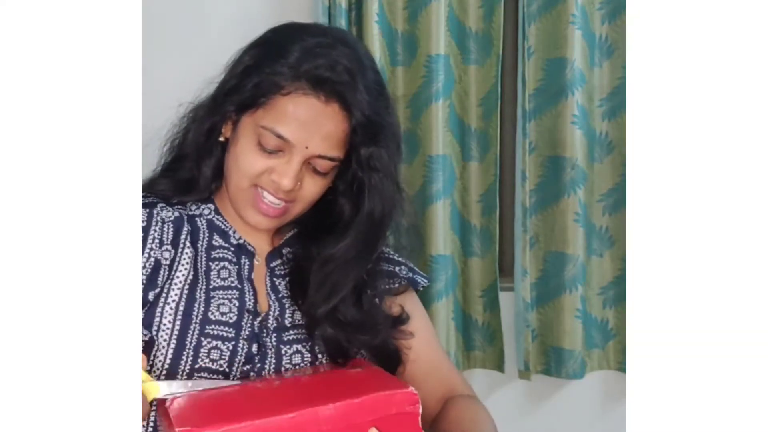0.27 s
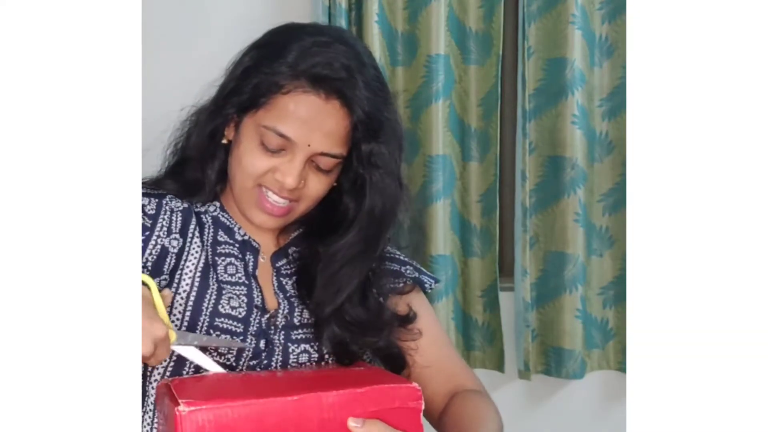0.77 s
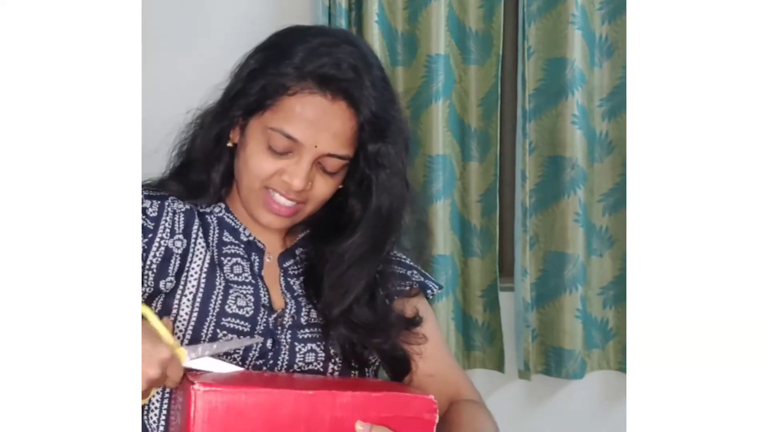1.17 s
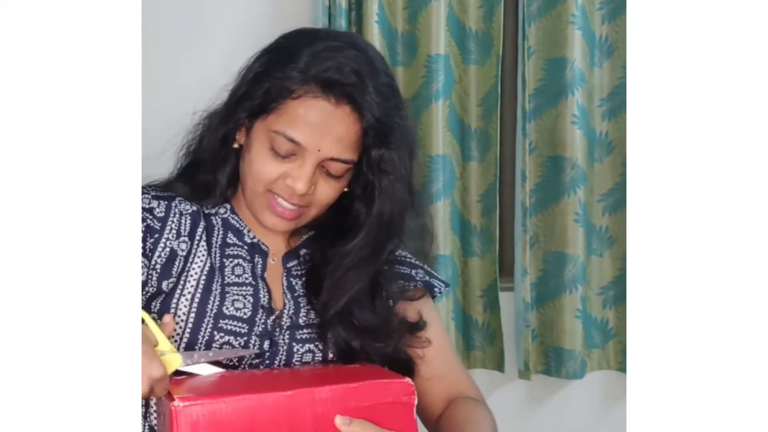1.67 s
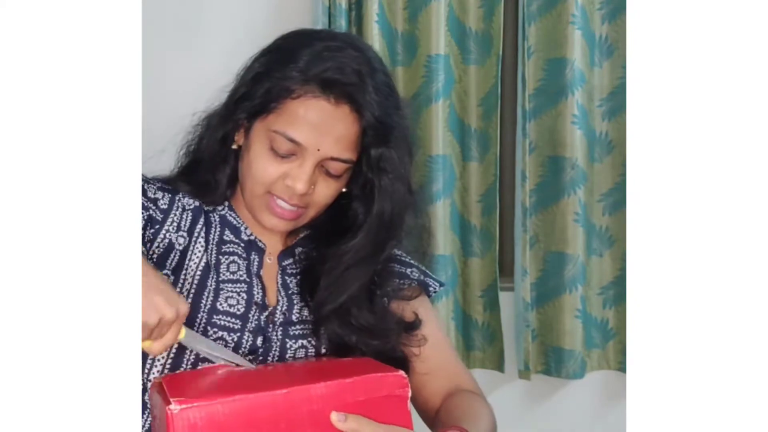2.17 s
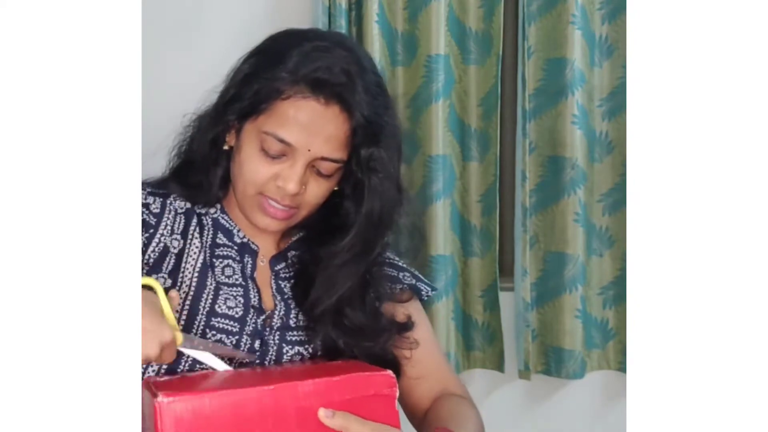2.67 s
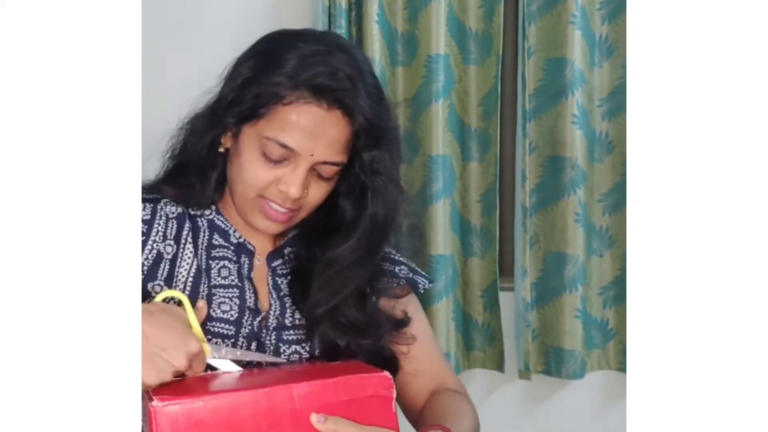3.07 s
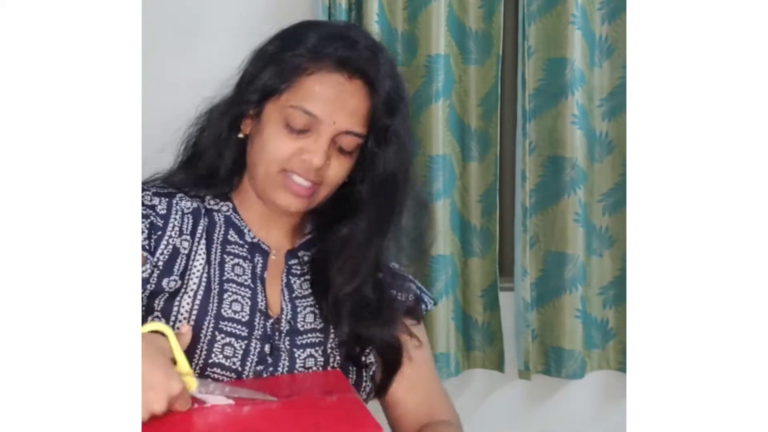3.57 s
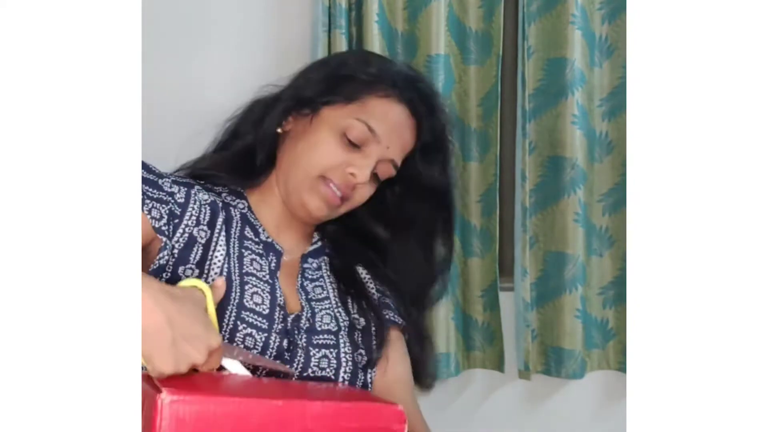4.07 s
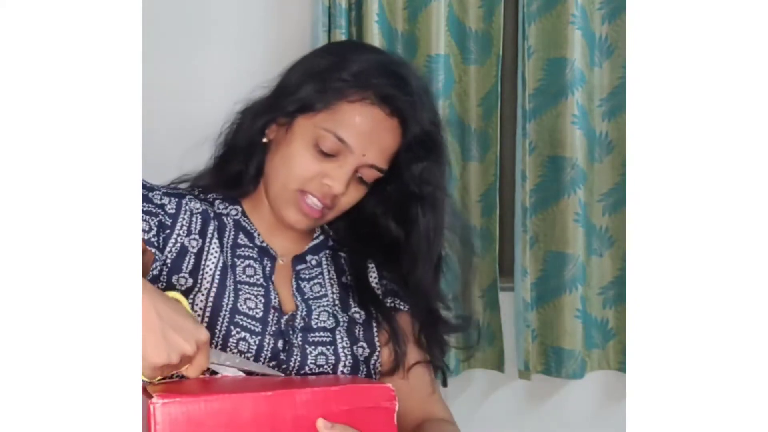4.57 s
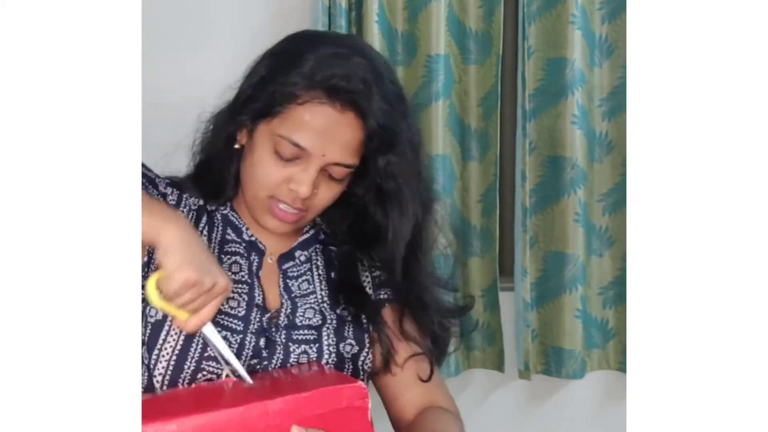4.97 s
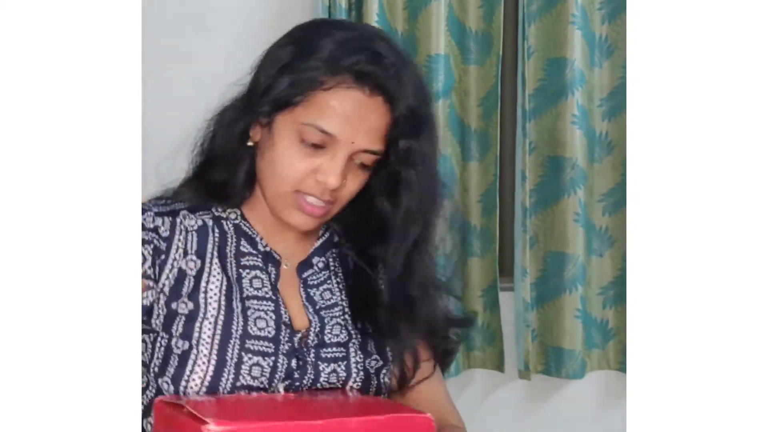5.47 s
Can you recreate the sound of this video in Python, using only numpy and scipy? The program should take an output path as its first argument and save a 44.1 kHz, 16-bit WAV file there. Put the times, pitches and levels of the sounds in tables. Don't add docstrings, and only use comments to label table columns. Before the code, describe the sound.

Close to a phone microphone in a small room, scissors nibble at a taped cardboard box: dry rasps, hissing tape, sharp snaps and boomy knocks. Traffic rumbles outside. After a quieter stretch with scattered cuts, a vehicle horn blares briefly and echoes away; then the blade bites again, ending with the hardest knock.

```python
import sys
import numpy as np
from scipy import signal
from scipy.fft import rfft, irfft, next_fast_len
from scipy.io import wavfile
from scipy.ndimage import uniform_filter1d

SR = 44100
rng = np.random.default_rng(int(sys.argv[2]) if len(sys.argv) > 2 else 0)


def invert_db(level):
    return 10 ** (np.asarray(level, dtype=float) / 20)


def master(y):
    cut = np.clip(np.atleast_2d(y).T, -1, 1)
    pcm = np.round(cut * 32767)
    wavfile.write(sys.argv[1], SR, pcm.astype(np.int16))


N = 252693


def in_time(rows, fade_in_s=0.0037):
    s, *columns = np.transpose(rows)
    t = np.arange(N) / SR
    mask = np.clip(np.minimum((t - s[0]) / fade_in_s, (s[-1] - t) / 0.005), 0, 1)
    return [np.interp(t, s, c) for c in columns] + [mask]


def rms_one(x):
    return x / np.sqrt(np.mean(x ** 2) + 1e-20)


def sine(turns):
    return np.sqrt(2) * np.sin(2 * np.pi * turns)


def drift(rate):
    r = np.exp(-64 * np.pi * rate / SR)
    slow = signal.lfilter([1], [1, -2 * r, r * r], rng.standard_normal(N // 32 + 1002))[1000:]
    return np.interp(np.arange(N) / 32, np.arange(len(slow)), rms_one(slow))


def resonance(x, hz, width_hz):
    r = np.exp(-np.pi * width_hz / SR)
    feedback = [1, -2 * r * np.cos(2 * np.pi * hz / SR), r * r]
    return signal.lfilter([(1 - r * r) / 2, 0, (r * r - 1) / 2], feedback, x + 1e-18)


def body(x, modes):
    out, power = 0, 0
    for k, (hz, width_hz, db) in enumerate(modes):
        out = out + invert_db(db) * (-1) ** k * resonance(x, hz, width_hz)
        power += invert_db(db) ** 2 * np.pi * width_hz / SR
    return out / np.sqrt(power)


def box():
    # frequency in [Hz], width in [Hz], level in [dB].
    air_modes = [(129.7, 31.7, -4.5), (175.2, 13.64, 0.5), (213, 15.1, -6), (298.4, 27.7, -1.5),
                 (350, 46.6, -3), (420, 36.6, 0.5), (558, 28, -15)]
    panel_modes = [(736, 114, 3), (833.6, 64.3, 8), (952.8, 29, 4.5), (1062, 97, 5), (1210, 285, 2),
                   (1480, 141.6, 7.5), (1600, 279, 2), (2065.6, 174.4, -1)]
    tape_modes = [(2627, 85, 1.5), (2982, 75.7, -1.5), (3927, 509, -1.5), (4935, 380, -4), (5886, 395, 2),
                  (6340, 856, 0), (6887, 787, -1), (8730, 1330, -8.5), (12500, 9000, -16)]
    snap_modes = [(2820, 650, -12), (4070, 1900, -8.5), (5816, 864, 7), (8850, 2650, 4.5),
                  (11540, 10800, 0.5), (15500, 3000, -4.5)]
    air, panels, tape = blade_force()
    rings, (panel_crack, snap_crack) = knocks()
    out = body(air, air_modes) + body(panels + panel_crack, panel_modes)
    return out + body(tape, tape_modes) + body(snap_crack, snap_modes) + rings


def blade_force(grains_per_s=8000, spread_db=2.6, judder_db=2.2):
    # start in [s], time to lose 20 dB in [s], box boom in [dB],
    # panel rasp in [dB re boom], tape hiss in [dB re boom].
    bites = [(.33, 0.08, -52.5, -4.5, -3.5), (.394, 0.05, -50, -2, -6.5), (0.562, .025, -44.5, -4.5, 1),
             (.598, 0.0052, -47.5, 1, 9.5), (.606, .09, -38, -1, 4), (0.834, .018, -36, 2.5, 9),
             (.842, .075, -34, 5, -1), (2.28, 0.39, -53.5, -3.5, 0), (2.676, 0.1124, -50.5, 0.5, -1),
             (2.852, .07, -34.5, -4.5, -3), (3.095, 0.0047, -48, -7.5, -13), (4.972, .035, -56, -1, -2.5),
             (5.047, .03, -43, -1, -5), (5.092, 0.087, -30.5, -2.5, -7.5), (5.34, .07, -31.5, -13.5, -20.5),
             (5.383, .018, -33, 5, 2), (5.385, .08, -28, 1, -12)]
    # middle in [s], then as for bites.
    slides = [(0.436, 0.0321, -27.5, -6, -17), (.51, 0.1432, -51, -14, -10.5), (.94, 0.21, -47, -6, -13),
              (1.815, .09, -58, -8, 0), (2.372, 0.0642, -36, -4.5, -6.5), (2.487, 0.0873, -47, -2.5, -6.5),
              (3.21, .13, -37, -10, -10), (5.03, .05, -50, 0, -6), (5.22, .09, -53, -4, -8),
              (5.376, -0.001, -28.5, -5, -12), (5.49, 0.2239, -58.5, 2, -18)]
    bite_rise_s, bite_roundness, slide_roundness = 0.003, 2.8, 1.6
    lead_db, lead_s = -15, 0.0144

    sizes = invert_db(spread_db * np.minimum(rng.exponential(1, N), 5)) * rng.choice([-1, 1], N)
    slips = rng.random(N) < grains_per_s / SR
    grains = rms_one(sizes * slips * invert_db(judder_db * drift(51.6)))

    force, t = np.zeros((3, N)), np.arange(N) / SR
    for s, fall_s, boom_db, rasp_db, hiss_db in bites:
        rise = np.clip((t - s) / bite_rise_s, 0, 1)
        lead_in = invert_db(lead_db - 20 * np.maximum(s - t, 0) / lead_s)
        fall = invert_db(-20 * (np.maximum(t - s, 0) / fall_s) ** bite_roundness)
        force += invert_db(boom_db + np.array([[0], [rasp_db], [hiss_db]])) * np.maximum(rise, lead_in) * fall
    for s, fall_s, boom_db, rasp_db, hiss_db in slides:
        shape = invert_db(-20 * np.abs((t - s) / fall_s) ** slide_roundness)
        force += invert_db(boom_db + np.array([[0], [rasp_db], [hiss_db]])) * shape
    return force * grains


def knocks(boom_cycles=4.13, panel_s=0.002866, crack_s=0.0027, rise_s=0.000872):
    # time in [s], peak in [dB], boom in [dB re peak], boom in [Hz], panel in [Hz].
    thumps = [(.375, -40, -0.5, 187, 1554), (.398, -30.5, 7.5, 167.2, 1600), (.424, -22.5, 7, 350, 722),
              (.432, -40, 15, 165, 900), (.479, -40.5, 14, 171.6, 748), (.611, -30, 7.5, 342, 1160),
              (.845, -22, 5, 421, 819), (1.136, -41.5, 5, 159.3, 810), (1.335, -47, 8, 341.4, 822),
              (2.049, -47, 8.5, 360, 707), (2.348, -48, 11, 146.7, 810), (2.476, -27.5, -23, 179, 1177),
              (2.851, -30, 7.5, 124.4, 1565), (3.092, -34.5, 1.5, 146.6, 855), (3.2, -34, 2.5, 390, 620),
              (3.217, -34.5, 12.5, 292, 1122), (3.345, -40, 10, 297.4, 1553),
              (5.017, -43.5, 5.5, 130.2, 1173), (5.093, -24, 5.5, 408.3, 948),
              (5.121, -26.5, -1.5, 420, 1319), (5.156, -31, -12, 165, 788), (5.344, -39, 27, 413.6, 590),
              (5.385, -8.5, -2, 314, 1567), (5.392, -18, -3.5, 264, 707)]
    # time in [s], peak in [dB], tick in [dB re peak], panel in [Hz].
    snips = [(.331, -46, 10, 1480), (.392, -34.5, 1, 1567), (.427, -36, 7, 1496), (.479, -47.5, 15, 1500),
             (.564, -35, 9, 1880), (.598, -34, 14, 1600), (.612, -35, 4, 1950), (.835, -10.5, 2, 1231),
             (2.019, -44, -4.5, 1210), (2.279, -35, 14, 1423), (2.389, -34, 3.5, 1086),
             (2.524, -47.5, 7, 1200), (2.676, -30.5, 5, 1528), (2.852, -28, 2, 1548), (4.39, -52, 2, 856),
             (4.795, -58.5, 3, 1370), (4.999, -43.5, 6.5, 1153), (5.046, -29.5, -3.5, 1210),
             (5.233, -41, 5, 1104), (5.017, -49, 11, 1200), (5.156, -42, 9, 1300), (5.385, -20, 0.5, 3044)]
    thump_tick_db, snip_boom_db, snip_boom_hz = -11.5, -8, 342.4

    rings, cracks, age = np.zeros(N), np.zeros((2, N)), np.arange(5000) / SR
    blows = [(s, db, boom_db, thump_tick_db, boom_hz, panel_hz) for s, db, boom_db, boom_hz, panel_hz in thumps]
    blows += [(s, db, snip_boom_db, tick_db, snip_boom_hz, panel_hz) for s, db, tick_db, panel_hz in snips]
    bursts = rng.standard_normal((len(blows), len(age)))
    for (s, db, boom_db, tick_db, boom_hz, panel_hz), burst in zip(blows, bursts):
        start = round(s * SR)
        span = slice(start, start + len(age))
        blow_rise_s = rise_s * invert_db(-0.3 * (db + 42.5))
        contact = (1 - np.exp(-age / blow_rise_s)) ** 2
        swell = 1 - np.exp(-age * boom_hz / 0.846)
        boom_decay = np.exp(-age * boom_hz * np.sqrt(boom_hz / 200) / boom_cycles)
        boom = swell * boom_decay * np.sin(2 * np.pi * boom_hz * age)
        panel = contact * np.exp(-age / panel_s) * np.sin(2 * np.pi * panel_hz * age)
        rings[span] += invert_db(db + boom_db - 3.5) * boom + invert_db(db - 1.0) * panel
        crack = contact * np.exp(-age / crack_s) * burst
        cracks[:, span] += invert_db(db + np.array([[-3], [tick_db - 3.5]])) * crack
    return rings, cracks


def room(x, t60_s=0.177, dull_hz=6000):
    size = next_fast_len(N + SR)
    hz = np.arange(size // 2 + 1) * SR / size
    t60 = t60_s / (1 + hz / dull_hz) ** 0.36
    response = 0
    for k, lag_s in enumerate(rng.uniform(0.006, 0.028, 10)):
        loop = invert_db(-60 * lag_s / t60) * np.exp(-2j * np.pi * hz * lag_s)
        response = response + (-1) ** k * loop / (1 - loop)
    return irfft(rfft(x, size) * response, size)[:N]


def horn(blare_smear_db=-12, overtone_smear_db=-4, scatter_per_s=1.6):
    # time in [s], blare in [dB].
    loudness = [
        (3.495, -68),
        (3.515, -39.5),
        (3.551, -27.5),
        (3.653, -29),
        (3.755, -31),
        (3.87, -39),
        (4.3, -49),
        (4.75, -53.5),
        (4.96, -75),
    ]
    # multiple of the pitch [1], level in [dB].
    blare = [(1, -22), (2, -34.5), (3, -33), (6, -32.5), (7, -16), (8, -6), (9, -2), (10, 1), (11, -6.5),
             (12, -15), (13, -40), (14, -32.5)]
    overtones = [(16, -9.5), (17, -7.5), (18, -5), (19, -6), (20, -4.5), (21, -5.5), (22, -2), (23, -11.5),
                 (24, -9), (25, -7), (26, -7.5), (27, -11.5), (28, -22), (30, -26.5), (33, -21), (36, -39),
                 (41, -24), (46, -28.5)]
    # level in [dB], flutter in [1/s], steady share [1].
    paths = [(-1, 9, 0.78), (-8, 16, 0.084), (-10, 20, .1), (-15.5, 9, .1)]
    path_shifts = [1, 1.011, 1.021, 1.038]
    end_hz, doppler_hz, passing_s = 338.3, 10.7, 0.3
    overtone_db, dulling_db_per_s = -14.5, 3.5

    blare_db, mask = in_time(loudness)
    on, out = mask > 0, np.zeros(N)
    age = np.arange(on.sum()) / SR
    hz = end_hz + doppler_hz * np.exp(-age / passing_s)
    turns = 2 * np.pi * np.cumsum(hz) / SR
    overtones_db = blare_db + overtone_db - dulling_db_per_s * (np.arange(N) / SR - loudness[0][0])
    scatter = 1 + scatter_per_s * age
    bounced = np.cumsum(scatter) / SR
    groups = ((blare, blare_db, blare_smear_db), (overtones, overtones_db, overtone_smear_db))
    for partials, db, smear_db in groups:
        stack, smear, known = 0, 0, np.transpose(partials)
        for multiple in range(round(known[0, 0]), round(known[0, -1]) + 1):
            level_db = np.interp(multiple, np.round(known[0]), known[1])
            count = 4 if multiple < 15 else 2
            draws = rng.standard_normal((count, 2, 600))
            for ratio, (path_db, per_s, steady), draw in zip(path_shifts, paths, draws):
                steps = bounced * 2 * per_s * np.sqrt(multiple / 9)
                cos_part, sin_part = (np.interp(steps, np.arange(600), d) for d in draw)
                phase = turns * multiple * (1 + (ratio - 1) * min(1, 11 / multiple))
                core = steady / scatter ** 2
                partial = (cos_part + core) * np.cos(phase) + sin_part * np.sin(phase)
                stack = stack + invert_db(level_db + path_db) * partial
            noise = rng.standard_normal(len(hz))
            smear = smear + invert_db(level_db) * resonance(noise, multiple * hz.mean(), 177)
        out[on] += (invert_db(db) * mask)[on] * (rms_one(stack) + invert_db(smear_db) * rms_one(smear))
    return out


def drones():
    # time in [s], pitch in [Hz], level in [dB].
    far_horn = [
        (0, 3296, -62),
        (.06, 3300, -68),
        (.12, 3305, -70),
        (.24, 3310, -80),
    ]
    # start in [s], length in [s], pitch in [Hz], glide in [Hz/s], level in [dB].
    orders = [
        (.1, 0.243, 161.7, -30, -53),
        (1.49, .49, 149.6, 14, -51),
        (2.45, 0.398, 166, -13, -45.5),
        (2.46, 0.596, 85.74, -9, -52.5),
        (4.12, 0.359, 144, 36, -57.5),
    ]
    fade_s, wobble_db = 0.07, 1.7

    far_hz, far_db, mask = in_time(far_horn)
    out = invert_db(far_db) * mask * sine(np.cumsum(far_hz) / SR)
    t = np.arange(N) / SR
    for s, length_s, hz, glide, db in orders:
        fade = np.clip(np.minimum(t - s, s + length_s - t) / fade_s + 0.5, 0, 1) ** 2
        turns = hz * (t - s) + glide * (t - s) ** 2 / 2
        out = out + invert_db(db + wobble_db * drift(4.5)) * fade * sine(turns)
    return out


def street(patchy_db=3.0, top_patchiness=0.52):
    # time in [s], roar in [dB].
    traffic = [(0.0, -61), (0.16, -64.5), (0.4, -63), (0.54, -56), (0.73, -57), (1.29, -65), (2.19, -69),
               (2.33, -70), (2.46, -60.5), (3.62, -57), (3.7, -55), (4.07, -61.5), (4.72, -67.5),
               (5.03, -69.5), (5.19, -59.5), (5.31, -58.5), (5.59, -62), (5.73, -64.5)]
    # frequency in [Hz], density in [dB per Hz].
    street_colour = [(18, -55), (30, -16), (112, -7.5), (157, 2.5), (191, -16), (349, -7.5), (489, -19),
                     (1050, -18), (1230, -17), (2100, -20.5), (2730, -64), (4620, -120)]
    hiss_colour = [(2200, 0.5), (3900, -4), (5000, -4.5), (6200, -8), (7600, -7), (8600, -18.5),
                   (16000, -17)]
    rumble_db, rumble_follows, hiss_db, hiss_follows = -51, 0.674, -65, 0.837

    roar_db, _ = in_time(traffic)
    swing = roar_db - roar_db.mean()
    edges_hz = 30 * 2 ** np.arange(0, 9.4, 1 / 3)
    white, together = rng.standard_normal((2, N)), drift(6)
    parts = np.zeros((3, N))
    for k, (low, high) in enumerate(zip(edges_hz, edges_hz[1:])):
        band = signal.sosfilt(signal.butter(2, [low, high], "band", fs=SR, output="sos"), white[k % 2])
        part = int(low > 580) + int(low > 2200)
        points = np.array(hiss_colour if part == 2 else street_colour)
        db = np.interp(np.log(low * high) / 2, np.log(points[:, 0]), points[:, 1])
        flicker = 0.5 * together + drift(11)
        parts[part] += band * invert_db(db + patchy_db * top_patchiness ** part * flicker)
    rumble, roar, hiss = (rms_one(part) for part in parts)
    out = invert_db(rumble_db + rumble_follows * swing) * rumble + invert_db(roar_db + 0.7065) * roar
    return out + invert_db(hiss_db + hiss_follows * swing) * hiss


def gate_lift_db(near):
    lift_db, opens_db, span_db, closes_db_per_s = 1.5, -48, 21, 126.5
    slope = closes_db_per_s * np.arange(N) / SR
    near_db = 10 * np.log10(uniform_filter1d(near ** 2, size=800) + 1e-12)
    held = np.maximum.accumulate(near_db + slope) - slope
    return lift_db * np.clip((held - opens_db) / span_db, 0, 1)


def scene():
    near = box()
    indoors = near + invert_db(-15) * room(near)
    outdoors = invert_db(gate_lift_db(near)) * street() + drones() + horn()
    return (indoors + outdoors)[None]


def band_limit(x):
    return signal.sosfilt(signal.butter(12, 16810, fs=SR, output="sos"), x)


def record(dry):
    # frequency in [Hz], width in [Hz], depth [0-1].
    mic_dips = [(2310, 330, .78), (5200, 650, .62), (2830, 130, .4), (4650, 250, .3)]
    for hz, width_hz, depth in mic_dips:
        dry = dry - np.clip(depth, 0, 1) * resonance(dry, hz, width_hz)
    dry = dry + invert_db(-87.5) * np.diff(rng.standard_normal(N + 1))
    dry = signal.sosfilt(signal.butter(2, 45, "high", fs=SR, output="sos"), dry)
    dry = signal.sosfilt(signal.cheby2(10, 40, 16400, fs=SR, output="sos"), dry)
    return band_limit(dry)


dry = scene()
out = record(dry)
master(out)
```